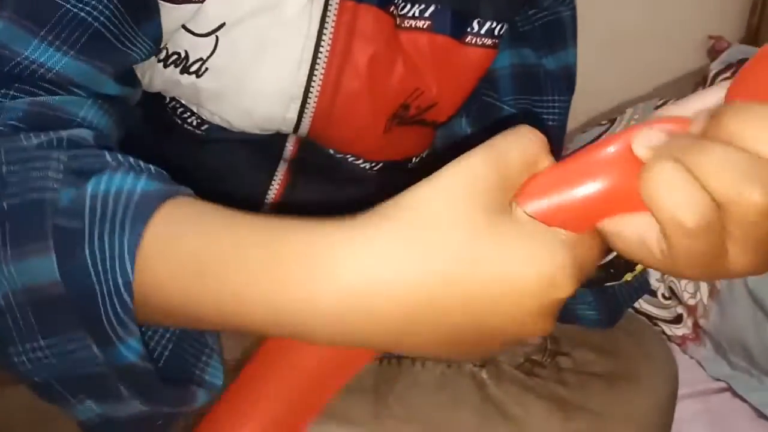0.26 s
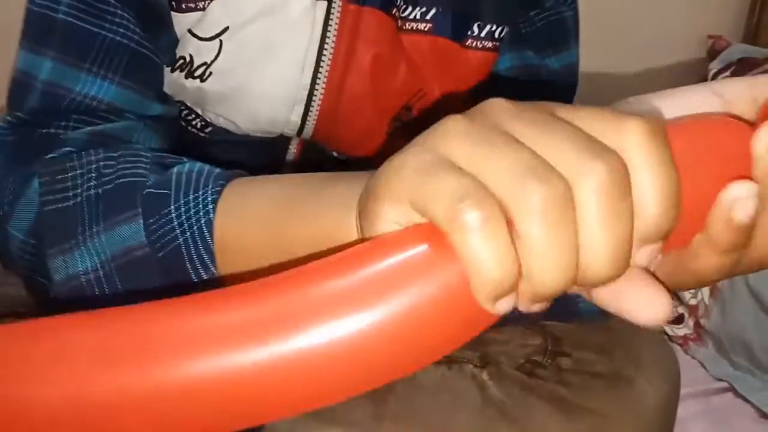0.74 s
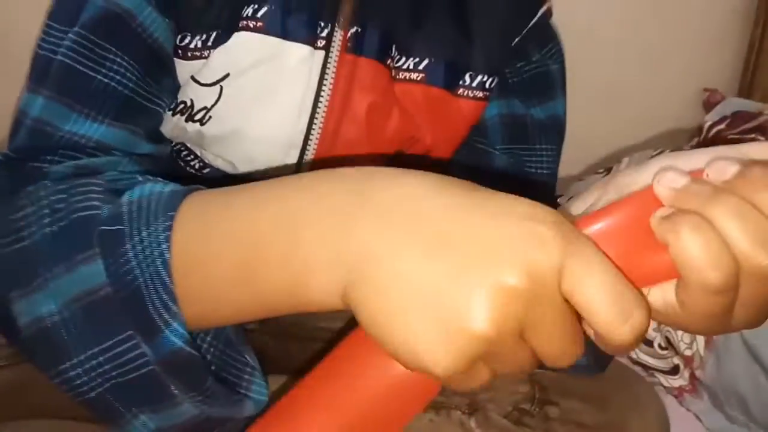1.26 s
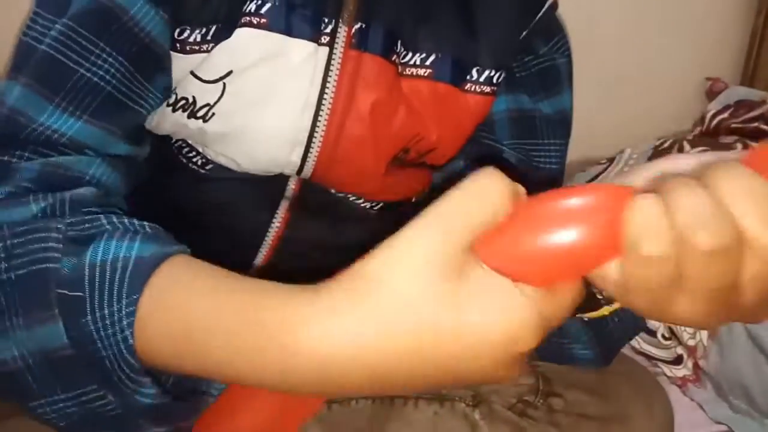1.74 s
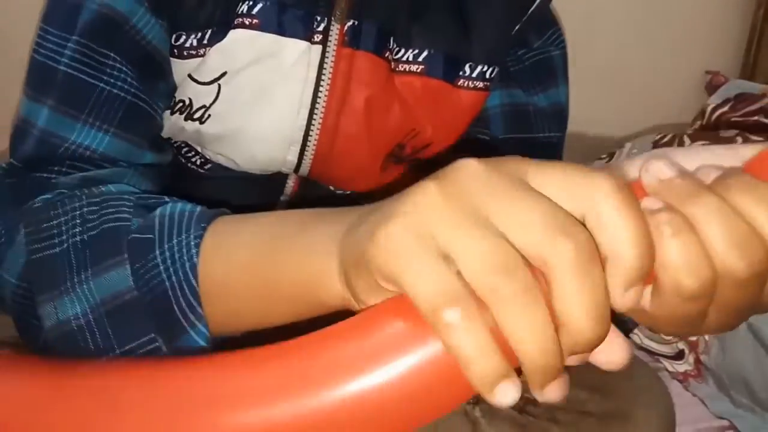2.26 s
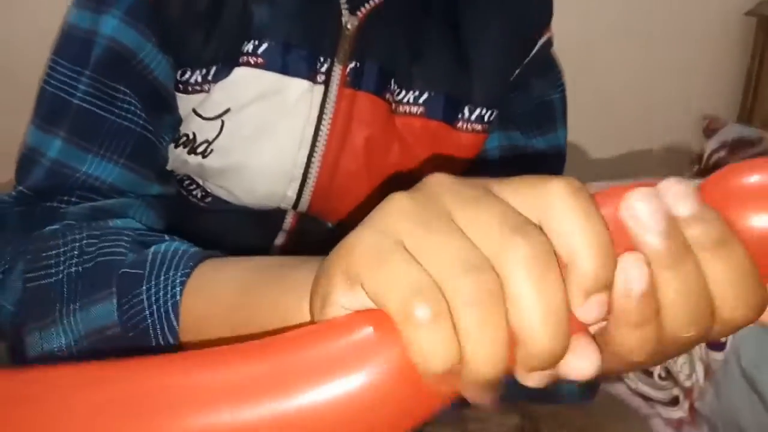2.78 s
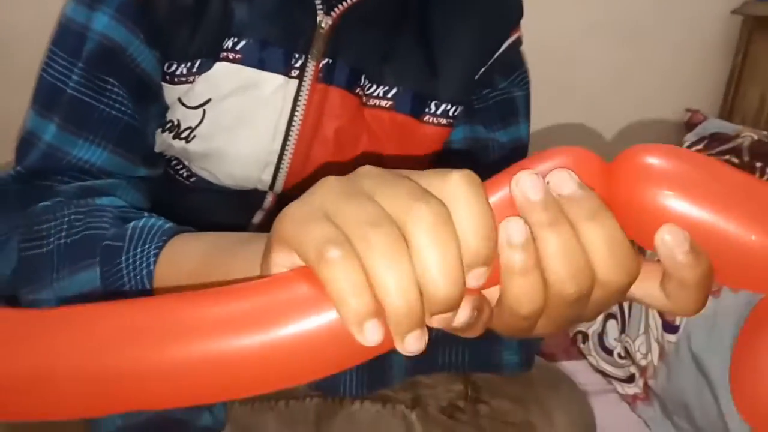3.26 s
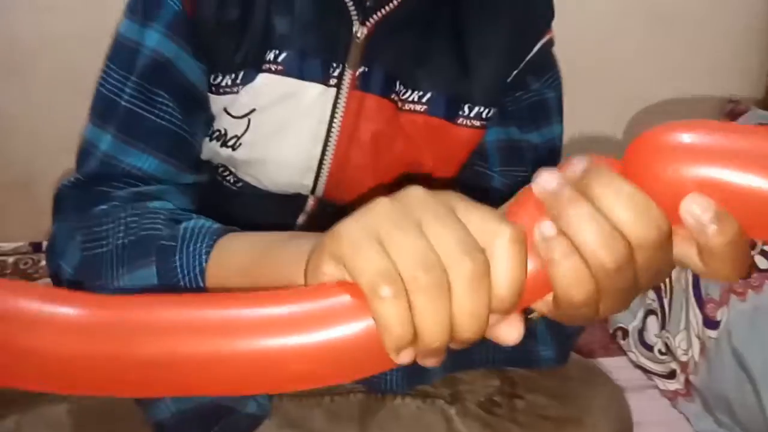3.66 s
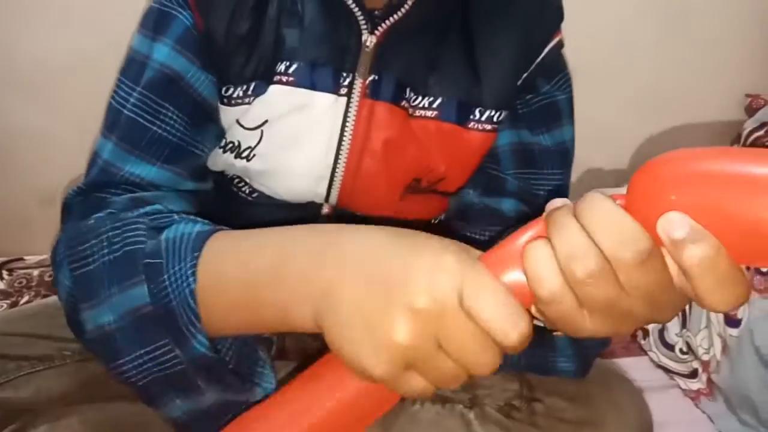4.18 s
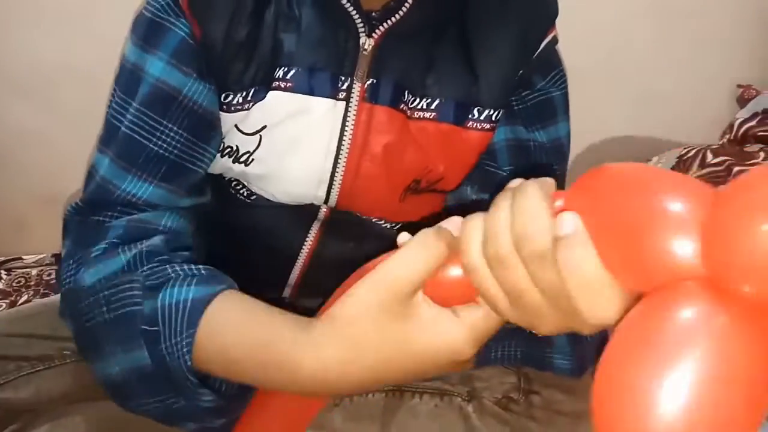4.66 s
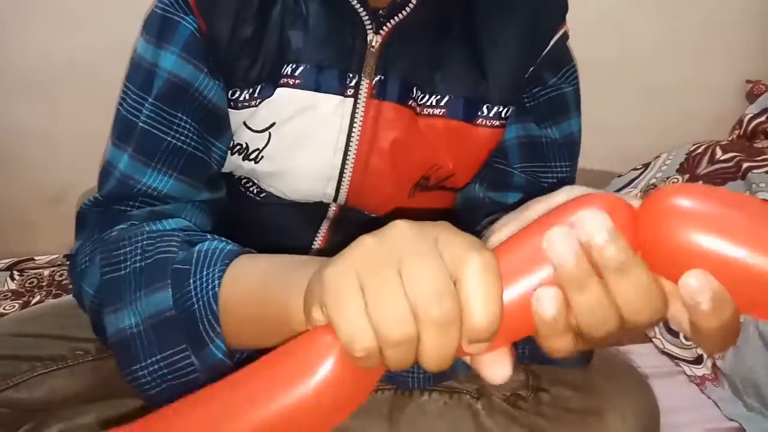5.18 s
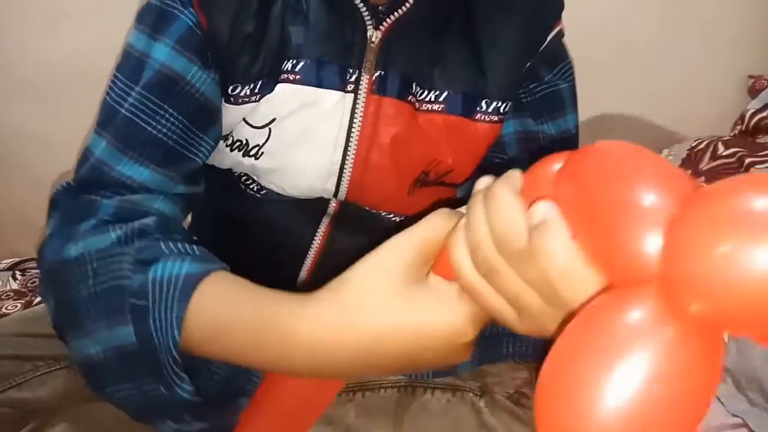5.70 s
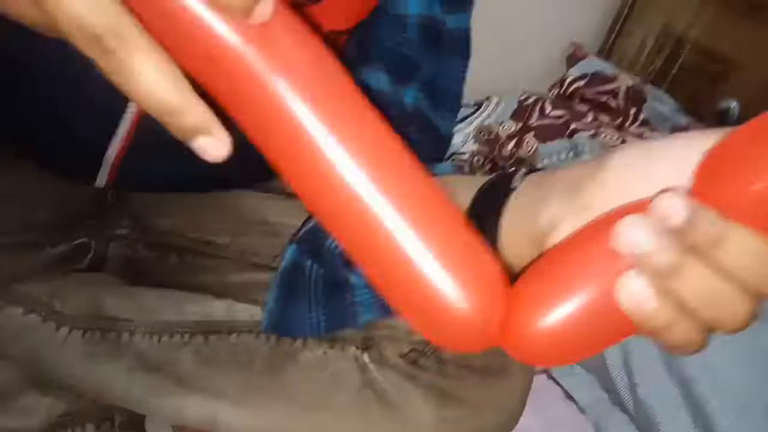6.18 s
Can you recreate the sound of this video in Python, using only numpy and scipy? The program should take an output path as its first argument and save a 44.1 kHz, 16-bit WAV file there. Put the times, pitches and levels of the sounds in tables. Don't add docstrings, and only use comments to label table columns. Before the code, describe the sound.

Close to a small microphone in a quiet furnished room, hands twist a long latex balloon. A hard snap comes almost at once, then scattered ticks and rubs. The strongest burst, a rubbery chattering creak with a sharp pop, comes past two seconds; another crisp one follows just before three. Afterwards there are only sparse small clicks, dull palm thumps and faint rubbing over soft hiss and a low hum.

```python
import sys
import numpy as np
from scipy import signal
from scipy.fft import rfft, irfft, next_fast_len
from scipy.io import wavfile
from scipy.ndimage import uniform_filter1d

SR = 44100
rng = np.random.default_rng(int(sys.argv[2]) if len(sys.argv) > 2 else 0)


def elevation(decibels):
    levels = np.asarray(decibels, float)
    return 10 ** (levels / 20)


def wav_record(signal):
    frames = np.transpose(np.atleast_2d(signal))
    bounded = np.clip(frames, -1, 1)
    quanta = np.round(bounded * 32767).astype(np.int16)
    wavfile.write(sys.argv[1], SR, quanta)


N = 283860

# pitch_hz, t60_s (time to fade by 60 dB)
LATEX_PATCHES = [
    (620, 0.0039),
    (1600, .005),
    (3350, 0.0037),
]
# start_s, peak_db, tautness_db
RINGING_SNAPS = [(.333, -9.5, 51), (.373, -8.5, 46), (0.438, -31, 0), (.541, -27.5, -27), (.573, -36, -7),
                 (.83, -44.5, -15), (.857, -46, -16), (1.035, -47, 13), (1.14, -41, 8), (1.197, -47, 11),
                 (1.241, -35.5, 3), (1.618, -46, 3), (2.029, -40, -2), (2.208, -54, 8), (2.25, -32.5, 8),
                 (2.259, -24, 9.5), (2.786, -38.5, 26), (2.813, -26.5, 25), (2.819, -30.5, 35),
                 (2.88, -20.5, 21), (3.077, -41, -25), (3.118, -43, -20), (4.545, -38, 8), (4.554, -24, 14),
                 (4.627, -34.5, 35), (4.802, -40, 16), (4.901, -32, -14), (5.03, -44, 1), (5.16, -39, 43),
                 (5.255, -46, 4)]
# start_s, peak_db, tautness_db
BROAD_SNAPS = [(.363, -7.5, 9), (.38, -41, -1), (0.613, -29.5, -15.5), (0.693, -40.5, -6),
               (1.515, -37.5, 44), (1.598, -37.5, -1), (1.651, -31, 42), (1.982, -34.5, -3),
               (2.086, -33, -19.5), (2.221, -42, 34), (2.281, -16.5, 20), (2.503, -8.5, 4),
               (2.643, -38, -9), (2.678, -31, -3), (2.865, -31, -10), (2.932, -21, -9.5), (3.042, -42, 16),
               (3.135, -48, 8), (3.26, -48, 13.5), (3.367, -45.5, 34.5), (3.395, -53, 12),
               (3.615, -39.5, -1), (3.741, -41.5, 29), (4.568, -35, 4), (4.837, -33.5, 24), (4.883, -36, 7),
               (5.957, -45, 17.5), (6.046, -42, 20), (6.132, -39, 7), (6.394, -36, -29)]
# start_s, peak_db, tautness_db
HELD_SNAPS = [(.133, -48.5, 45), (.405, -21, -9), (.597, -41, -8), (.624, -26.5, -2), (0.668, -39, 31),
              (.921, -33, 24), (.996, -37, 29), (1.663, -23.5, 23), (2.136, -39.5, 48),
              (2.145, -34.5, 62.5), (2.155, -61, 14), (2.475, -26, -12), (2.63, -44, 20), (2.855, -34.5, 8),
              (3.174, -39.5, 36), (3.541, -32, -4), (3.574, -42.5, -2.5), (4.104, -53.5, 12),
              (4.584, -43, 17), (4.786, -54, 22), (4.818, -29, 18), (4.981, -36.5, -10), (5.065, -47, 7),
              (5.095, -32.5, -9), (5.372, -38, -7), (6.22, -37.5, 26.5), (6.334, -46.5, 25.5),
              (6.422, -29, -20), (0.234, -52, 23), (6.433, -25.5, 3)]
# time_s, effort_db, tautness_db
TWISTS = [
    [(.341, -28.5, -5.5), (.355, -48, 2), (.362, -28, 0), (.366, -17.5, -7), (.371, -31, -11),
     (.381, -25.5, -5), (.39, -29.5, -4), (.45, -46.5, -4.5)],
    [(1.61, -51, -5.5), (1.642, -42.5, -16), (1.66, -35.5, -1), (1.696, -29.5, -32), (1.72, -79, 11)],
    [(1.893, -36, -7), (1.903, -35, -11.5), (1.917, -33, -11.5), (1.931, -48.5, -4.5), (1.99, -49.5, -5.5),
     (2.005, -66, -4)],
    [(2.281, -27, 15), (2.299, -17.5, 10.5), (2.312, -12, 2), (2.322, -18.5, 1.5), (2.333, -15, -3),
     (2.349, -18, -4), (2.37, -28.5, -1.5)],
    [(2.885, -40, 5), (2.9, -35.5, 4), (2.906, -22.5, 19), (2.919, -21, 11), (2.935, -28.5, -3),
     (2.96, -39, -5.5)],
]
# start_s, rise_s, fall_s, top_db, tautness_db
RUBS = [(.57, 0.056, 0.0098, -39.5, -11.5), (1.312, .018, 0.0082, -41.5, 25),
        (2.627, 0.055, .015, -39, -14), (3.11, .03, 0.0074, -31, -16), (3.55, 0.027, 0.037, -49.5, -3.5),
        (4.45, 0.12, 0.057, -42.5, 1.5), (4.785, 0.047, 0.043, -36, 0), (4.87, 0.045, 0.036, -29.5, -22.5),
        (5.061, 0.016, 0.08, -45, -5.5), (5.43, 0.077, 0.21, -55.5, -5), (3.355, .045, 0.022, -59.5, 10),
        (5.951, 0.0087, 0.12, -47, -0.5), (6.123, 0.021, 0.024, -44.5, -7), (6.387, .009, .04, -36, -11),
        (6.404, 0.031, 0.065, -30.5, -3.5), (2.02, 0.0133, .04, -50, -1.5), (6.2, 0.018, 0.012, -53, -7.5)]
# start_s, length_s, first_hz, last_hz, level_db
REEDY_SQUEAKS = [(1.893, 0.012, 624, 560, -26.5), (1.895, 0.022, 835, 782, -29.5),
                 (1.906, .017, 446, 498, -23), (2.49, 0.0094, 923, 854, -37), (2.903, 0.037, 441, 459, -27),
                 (2.892, .02, 422, 437, -36.5)]
# start_s, length_s, first_hz, last_hz, level_db
PURE_SQUEAKS = [(5.075, 0.021, 477, 520, -48.5), (3.79, 0.2, 880, 970, -70), (4.298, .11, 580, 590, -68),
                (1.312, .034, 1650, 1082, -52), (2.297, .028, 375, 385, -33), (2.322, .04, 220, 185, -26),
                (2.333, .04, 390, 330, -29), (.075, .11, 3750, 3750, -68), (5.62, .11, 3750, 3850, -70),
                (2.37, .05, 340, 350, -51), (5.86, 0.075, 99, 95, -38)]
# start_s, length_s, first_hz, last_hz, level_db
NASAL_SQUEAKS = [
    (5.538, 0.036, 782, 777, -59.5),
    (5.56, 0.026, 885, 1104, -60.5),
]
# start_s, peak_db, pitch_hz
THUMPS = [(0.359, -54, 441), (0.54, -50, 650), (0.616, -37.5, 432), (1.164, -44.5, 143),
          (1.231, -36.5, 143), (1.678, -26.5, 178), (1.695, -27, 364), (2.074, -31.5, 270),
          (2.181, -41, 231), (2.305, -28, 380), (2.33, -22, 373), (2.639, -34, 455), (3.132, -34.5, 135.6),
          (4.144, -40, 179.3), (4.902, -32, 169.4), (4.922, -32.5, 353), (4.938, -31, 168.5),
          (5.358, -34.5, 148), (6.134, -35, 450), (6.419, -30.5, 129)]
# frequency_hz, gain_db
RADIATION = [(30, -43), (100, -8.5), (200, -1), (400, 2), (16000, 1)]
# time_s, briskness_db
MOVES = [(0, -68.5), (.16, -67.5), (.38, -67), (.93, -72), (1.34, -67.5), (1.9, -65.5), (2.02, -68.5),
         (2.35, -52), (2.5, -61), (2.75, -69.5), (2.99, -53), (3.17, -70), (4.68, -74), (4.86, -59.5),
         (4.96, -74.5), (5.54, -65.5), (6.0, -74), (6.44, -95)]
# frequency_hz, level_db (per Hz)
DULL = [(76, -28.5), (130, -0.5), (589, -11.5), (828, -11.5), (932, -13), (1350, -15.5), (3000, -25),
        (3900, -59.5), (6600, -120)]
# frequency_hz, level_db (per Hz)
BRIGHT = [(1500, -26.5), (2500, -0.5), (3700, 3), (8000, -1.5), (16000, -17.5)]
# time_s, level_db
SWELLS = [(0, -63.5), (.7, -63.5), (1.9, -65), (2.3, -76), (3.201, -65.5), (4.1, -62), (4.86, -62.5),
          (5.299, -51.5), (6.0, -54), (6.2, -60), (6.44, -59.5)]
# frequency_hz, level_db (per Hz)
DRONE = [(13, -50), (22, -22.5), (75, 0.5), (93, 5.5), (113, -5.5), (170, -13.5), (220, -30.5), (370, -120)]
# frequency_hz, t60_s
ROOM = [(200, .2), (600, 0.17), (1500, 0.27), (4000, 0.18), (8000, 0.13)]
# frequency_hz, gain_db
MIC = [(60, -9.5), (300, -5.5), (3900, 3), (4500, -11.5), (5300, -21.5), (6200, -15), (7600, -28.5),
       (10000, -41.5), (15000, -49.5)]
# frequency_hz, level_db (per Hz)
SELF_NOISE = [(1000, 3.5), (10000, -2), (13000, -3.5), (16000, -5)]


def snaps():
    s, peak_db, taut_db = np.transpose(RINGING_SNAPS + BROAD_SNAPS + HELD_SNAPS)
    counts = [len(RINGING_SNAPS), len(BROAD_SNAPS), len(HELD_SNAPS)]
    middle_db = np.repeat([11, 6.5, -5.5], counts)
    levels_db = patch_levels(peak_db, taut_db, middle_db) + 3.0
    blow_s = s + .0011
    blow = slips(blow_s, levels_db, spread=.07, lag_s=.0003, crack_db=3, ring=.7)
    wait_s = np.cumsum(.0015 + .002 * rng.random((len(s), 2)), axis=1)
    shudder_s = (blow_s[:, None] + wait_s).T.ravel()
    shudder_db = np.concatenate([levels_db - 10.0, levels_db - 21.5], axis=1)
    shudders = slips(shudder_s, shudder_db, spread=.15, lag_s=.001, crack_db=0, ring=.9)
    return blow + shudders


def chatter(per_s=500, scatter=.28, size_db=2.6):
    times, levels = [], []
    for run in TWISTS + [rub(*row) for row in RUBS]:
        s, effort_db, taut_db = np.transpose(run)
        gap_dice, size_dice = np.clip(rng.standard_normal((2, 90)), -1.6, 1.6)
        when = s[0] + np.cumsum(np.exp(scatter * gap_dice)) / per_s
        mute_db = -99 * (when > s[-1])
        strength_db = np.interp(when, s, effort_db) + size_db * size_dice + mute_db
        times.append(np.minimum(when, s[-1]))
        levels.append(patch_levels(strength_db, np.interp(when, s, taut_db), middle_db=2))
    levels_db = np.concatenate(levels, axis=1) + 3
    return slips(np.concatenate(times), levels_db, spread=.14, lag_s=.0013, crack_db=4, ring=.95)


def rub(s, rise, fall, db, taut_db):
    start = (s, db - 19.5, taut_db + 8.5)
    top = (s + rise, db, taut_db)
    end = (s + rise + fall, db - 21, taut_db - 8.5)
    return [start, top, end]


def patch_levels(db, taut_db, middle_db):
    low_share = 0.77
    low_db, high_db = -low_share * taut_db, (1 - low_share) * taut_db
    shape_db = np.array([low_db, middle_db + 0 * taut_db, high_db])
    return db + shape_db - shape_db.max(axis=0)


def slips(s, levels_db, spread, lag_s, crack_db, ring):
    out = np.zeros(N)

    def dice():
        return np.clip(rng.standard_normal((3, len(s))), -2, 2)

    for side in (0, 1, -1):
        for (hz, t60), level_db in zip(LATEX_PATCHES, levels_db):
            pitch, size, late = dice()
            start = s + abs(side) * lag_s * np.abs(late)
            ring_hz = hz * np.exp(0.24 * side + spread * pitch)
            ring_db = level_db + 1.6 * size - 3.1 * abs(side)
            out += grains(start, ring_hz, ring_db, ring * t60 * np.exp(0.35 * size), size=320)
    for hz, db in [(6500, -4.0), (11500, -1)]:
        pitch, size, late = dice()
        loud_db = levels_db[2] + crack_db + db + 1.0 * size
        start = s + lag_s * np.abs(late)
        out += grains(start, hz * np.exp(.15 * pitch), loud_db, np.full(len(s), 0.0034), size=80)
    return out


def squeaks(waver=.03, rough=.3):
    out = np.zeros(N + SR)
    rows = [(*row, -9.5) for row in REEDY_SQUEAKS]
    rows += [(*row, -25.5) for row in PURE_SQUEAKS]
    rows += [(*row, -5) for row in NASAL_SQUEAKS]
    for s, length, first_hz, last_hz, db, fall_db in rows:
        u = np.arange(round(length * SR)) / (length * SR)
        drift, grit = wobble(u, 8 + len(u) // 150), wobble(u, 24)
        hz = (first_hz + (last_hz - first_hz) * u) * (1 + waver * drift)
        phase = 2 * np.pi * np.cumsum(hz) / SR
        stack = sum(elevation(k * fall_db) * np.sin((k + 1) * phase) for k in range(5))
        swell = elevation(db + 6.5) * np.sin(np.pi * u) ** .6
        out[round(s * SR):][:len(u)] += swell * (1 + rough * grit) * stack
    return out[:N]


def wobble(u, n):
    return np.interp(u, np.linspace(0, 1, num=n), rng.standard_normal(n))


def thumps(cycles=5.3):
    s, db, hz = np.transpose(THUMPS)
    return grains(s, hz, db + 7.5, cycles / hz, size=1400)


def rustle():
    brisk_db = np.interp(np.arange(N) / SR, *np.transpose(MOVES))
    dull_db = -60 + 0.095 * (brisk_db - brisk_db.mean())
    when, pitch, size = rng.random((900, 3)).T
    speck_hz = 1800 * np.exp(1.4 * (pitch - .3))
    speck_db = -5.5 * np.log(size + 0.038)
    specks = grains(when * N / SR, speck_hz, speck_db, np.full(len(when), 0.0043), size=200)
    brushing = hiss(BRIGHT, patchy_db=3.5) + 0.14 * unit(specks)
    return elevation(dull_db) * hiss(DULL, patchy_db=-2.3) + elevation(brisk_db) * brushing


def house_drone():
    swell_db = np.interp(np.arange(N) / SR, *np.transpose(SWELLS))
    return (elevation(swell_db) + elevation(-68.5)) * hiss(DRONE, patchy_db=1.5)


def room(x):
    out, part = np.zeros(N + SR), SR // 4
    for start in range(0, N, part):
        hz, t, z = signal.stft(rng.standard_normal(SR // 2), SR, nperseg=256)
        fade = elevation(-60 * t / along(ROOM, hz)[:, None])
        tail = signal.istft(z * fade, SR, nperseg=256)[1]
        answer = signal.fftconvolve(x[start:start + part], tail / np.linalg.norm(tail))
        out[start + 130:][:len(answer)] += answer
    return out[:N]


def grains(s, hz, db, t60, size):
    t = np.arange(size) / SR
    turns = hz[:, None] * t
    fade = elevation(db[:, None] - 60 * t / t60[:, None])
    ring = fade * np.sin(2 * np.pi * turns) * (1 - np.exp(-turns / 0.24))
    where = np.round(s * SR).astype(int)[:, None] + np.arange(size)
    return np.bincount(where.ravel(), ring.ravel(), N + SR)[:N]


def hiss(points, patchy_db):
    z = signal.stft(rng.standard_normal(N), nperseg=512)[2]
    field = uniform_filter1d(rng.standard_normal(z.shape), 6, 0)
    field = uniform_filter1d(field, 8, 1)
    noise = signal.istft(z * elevation(patchy_db * unit(field)), nperseg=512)[1][:N]
    return unit(coloured(noise, points))


def coloured(x, points):
    m = 2 * next_fast_len(N // 2 + 4096)
    gain = elevation(along(points, np.fft.rfftfreq(m, 1 / SR)))
    cep = irfft(np.log(gain), m)
    cep[1:m // 2] *= 2
    cep[m // 2 + 1:] = 0
    return irfft(rfft(x, m) * np.exp(rfft(cep)), m)[:N]


def along(points, hz):
    f, v = np.transpose(points)
    return np.interp(np.log(hz + 1), np.log(f + 1), v)


def unit(x):
    return x / np.sqrt(np.mean(x ** 2) + 1e-20)


def scene():
    crackle = coloured(snaps() + chatter() + thumps(), RADIATION)
    tones = coloured(squeaks(), RADIATION)
    echo = elevation(-14.5) * room(crackle + elevation(-1.5) * tones)
    return (crackle + tones + echo + rustle() + house_drone())[None]


def top_cut(x):
    return signal.sosfilt(signal.butter(12, 15500, fs=SR, output="sos"), x)


def record(dry):
    mix = coloured(dry[0], MIC) + elevation(-78.0) * hiss(SELF_NOISE, patchy_db=0.8)
    return top_cut(mix[None])


dry = scene()
out = record(dry)
wav_record(out)
```